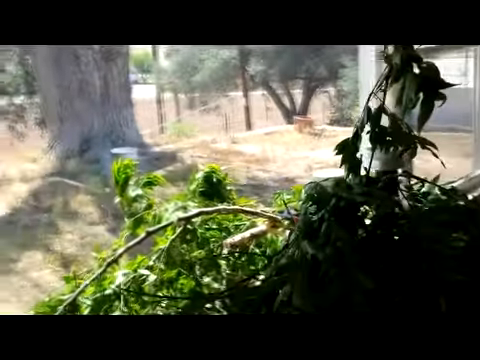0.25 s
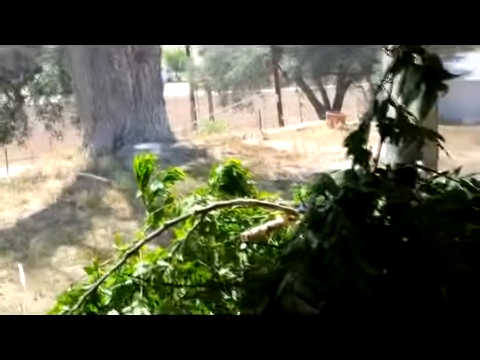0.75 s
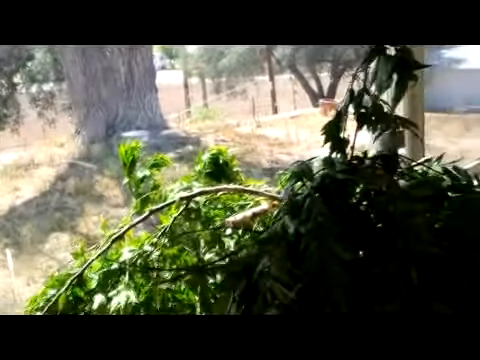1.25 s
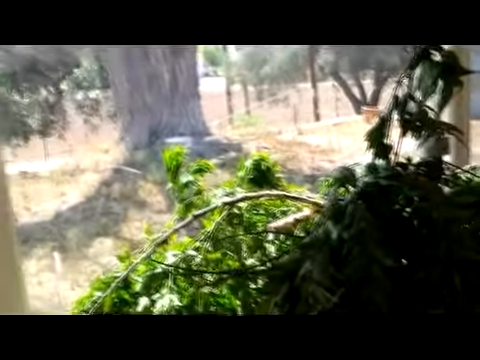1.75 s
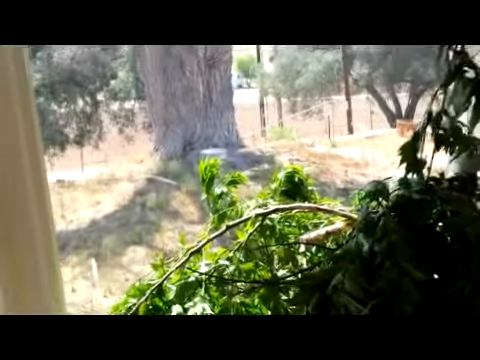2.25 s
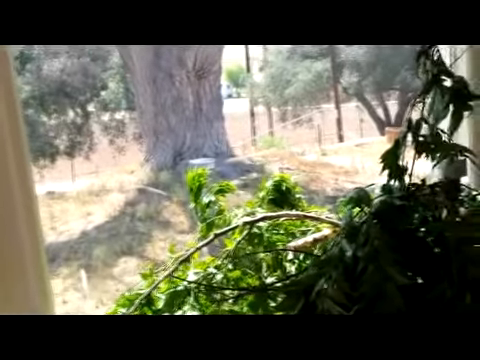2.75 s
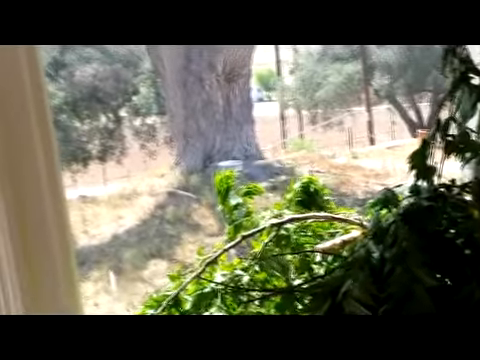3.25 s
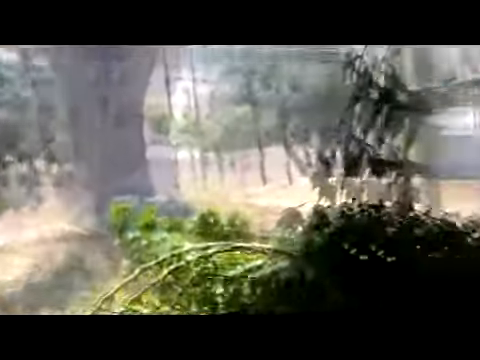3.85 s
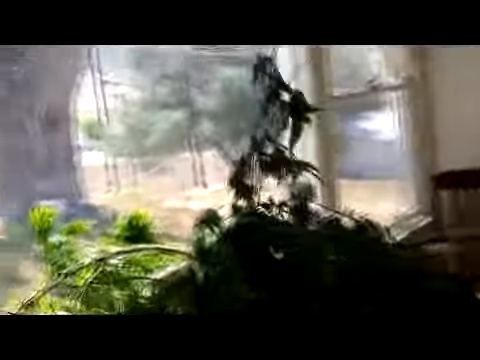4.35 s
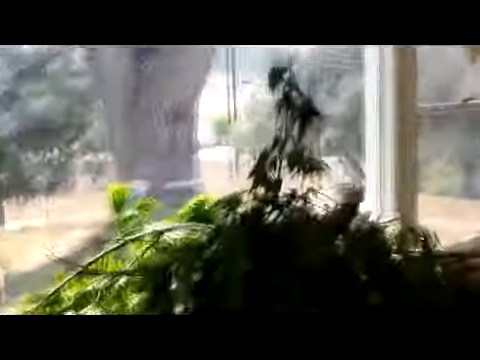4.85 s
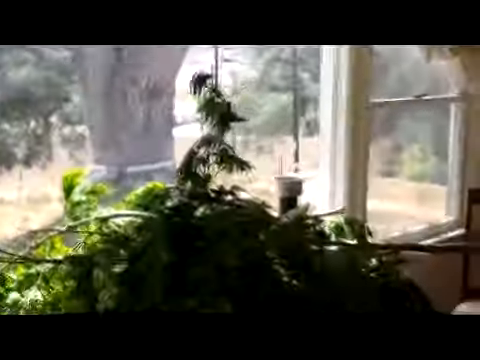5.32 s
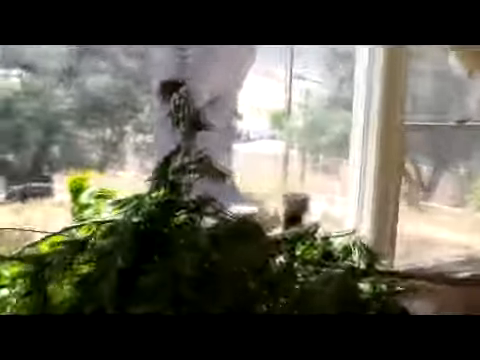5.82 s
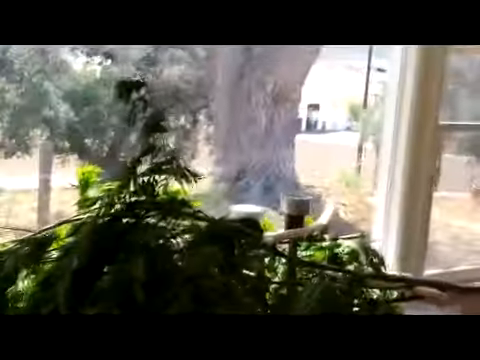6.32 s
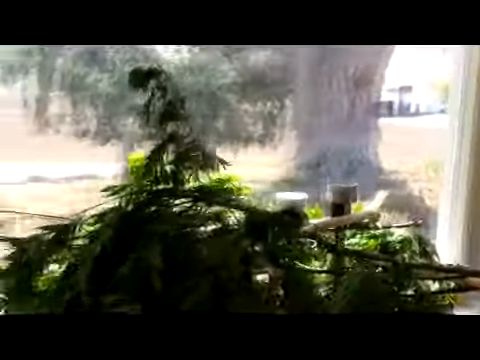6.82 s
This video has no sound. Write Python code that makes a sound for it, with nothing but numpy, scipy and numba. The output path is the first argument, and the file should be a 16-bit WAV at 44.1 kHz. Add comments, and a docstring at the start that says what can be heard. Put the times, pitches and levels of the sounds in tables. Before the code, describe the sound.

A bare wooden room with short, bright echoes, heard through a hissy handheld stereo microphone; low rumble swells and fades. A parrot bites twigs: crisp crackles at 0.2 and 0.34 s, soft thuds around 0.4-0.55, a camera tick close on the left at 0.55, then a dense splintering run at 0.64-0.69. A very faint thin whine lingers until 1.3. Light snaps at 1.7-1.9, a stronger cluster at 2.17-2.3, a sharp left-leaning pair at 3.15. Hard left camera ticks strike at 3.1 and 3.7, with a bright tick beside the latter. Another crunchy snap falls at 4.38. At 4.62-4.69 a quick sliding swish, deep thumps and a piercing tick; hiss and air sink for about a second, broken by a tick at 4.9. Background returns by 6; a patter of soft knocks at 6.26-6.32, a tiny board squeak at 6.38, the loudest snap at 6.5, and a last left tick at 6.86.

```python
"""From the start there is hiss, air and a low rumble that swells at times; they sink for about a second near 4.7 s.
From 0.2 s a parrot bites twigs in a bare wooden room: noisy runs of short crackles ring on between the walls.
A thin whine (a narrow band of noise) joins early, then bright damped ticks and soft thuds of decaying sine.
At 0.55 s the camera shell first ticks, close to the left microphone, as a handful of damped modes.
From about 1.2 s swishes of band noise pass by, a few sliding in pitch; late on, a sine squeaks like a board."""
import sys
import numpy as np
from scipy import signal
from scipy.fft import rfft, irfft
from scipy.io import wavfile
from scipy.ndimage import uniform_filter1d
from numba import njit

SR = 44100
rng = np.random.default_rng(int(sys.argv[2]) if len(sys.argv) > 2 else 0)


def store_pcm(level_fs):
    """Save levels as 16-bit WAV."""
    pcm = np.round(np.clip(level_fs, -1, 1) * 32767).astype(np.int16)
    wavfile.write(sys.argv[1], SR, np.atleast_2d(pcm).T)


N = 312228


def undb(db):
    """Turn decibels into a plain multiplier."""
    return 10 ** (np.asarray(db) / 20)


def unit(x):
    """Scale a sound to an average (RMS) strength of 1."""
    return x / np.sqrt(np.mean(x ** 2))


def lean(left_minus_right_db):
    """Multipliers for left and right that share a level difference equally."""
    return undb(np.array([[left_minus_right_db], [-left_minus_right_db]]) / 2)


def curve(table):
    """Columns of a (t/s, value, ..) table, joined by straight lines, one value a sample."""
    s, *columns = np.transpose(table)
    return [np.interp(np.arange(N) / SR, s, c) for c in columns]


def on_log(points, hz, column=1):
    """Read a table column at the given pitches, spacing pitch as the ear does."""
    points = np.array(points)
    return np.interp(np.log(hz), np.log(points[:, 0]), points[:, column])


@njit
def sliding_band(x, hz, width):
    """State-variable band-pass whose centre may move, gain 1 there."""
    y, band, low = np.empty(len(x)), 0., 0.
    for i in range(len(x)):
        g, k = np.tan(np.pi * hz[i] / SR), width[i] / hz[i]
        v = (band + g * (x[i] - low)) / (1 + g * (g + k))
        band, low, y[i] = 2 * v - band, low + 2 * g * v, k * v
    return y


def resonate(x, modes):
    """Sum of fixed resonances, alternate signs to keep the valleys between them filled."""
    total = 0
    for k, (hz, width, db) in enumerate(modes):
        ringing = signal.lfilter(*signal.iirpeak(hz, hz / width, fs=SR), x)
        total = total + (-1) ** k * undb(db) * ringing
    return total


def resonate_twice(x, modes):
    """Pass through the same resonances twice, for steeper sides."""
    return resonate(resonate(x, modes), modes)


def blip(hz, rise_ms):
    """A heavily damped mode: a sine that swells to its peak in rise_ms, then dies away."""
    t = np.arange(600) / SR
    u = t * 1000 / rise_ms
    return u * np.exp(1 - u) * np.sin(2 * np.pi * hz * t)


def add(out, sound, s):
    """Mix a sound in, starting at s seconds."""
    i = int(s * SR)
    out[:, i:i + sound.shape[1]] += sound[:, :N - i]


def swells(s, db, rise_s, fall_s):
    """Level in dB, one row a swell, one value a millisecond: straight up to the peak, straight down."""
    late = np.arange(0, N / SR, 1 / 1000) - s[:, None]
    tens_of_db = np.where(late < 0, -late / rise_s[:, None], late / fall_s[:, None])
    return db[:, None] - 10 * tens_of_db, late


def per_sample(x):
    """Stretch one value a millisecond to one value a sample."""
    return np.interp(np.arange(N) / SR * 1000, np.arange(len(x)), x)


WANDER_PER_S = 12  # new random levels a second


def wander():
    """Random levels held briefly and smoothed into slopes; spread near 1."""
    k = int(SR / WANDER_PER_S)
    steps = np.repeat(rng.standard_normal(N // k + 1), k)
    return 1.2 * uniform_filter1d(steps, k)[:N]


# balance of hiss and air between the ears: f/Hz, left minus right level/dB
NOISE_LEAN = [(500, 0.5), (4400, 3.2), (8000, -0.6), (15000, -7.5)]


def coloured(points, shared_below_hz):
    """Noise of a given spectrum, silent outside it; alike in both ears in the bass, unrelated higher up."""
    hz = np.maximum(np.fft.rfftfreq(N, 1 / SR), 1)
    half_lean = on_log(NOISE_LEAN, hz) / 2
    inside = (hz > points[0][0]) & (hz < points[-1][0])
    share = 1 / (1 + (hz / shared_below_hz) ** 2)
    shared = np.sqrt(share) * rfft(rng.standard_normal(N))
    own = np.sqrt(1 - share) * rfft(rng.standard_normal((2, N)))
    level_db = on_log(points, hz) + np.array([half_lean, -half_lean])
    return unit(irfft((shared + own) * inside * undb(level_db), N))


# colour of the microphones' hiss: f/Hz, relative level/dB per Hz
HISS_SPECTRUM = [(1470, -16), (2500, -13.5), (3190, -12), (4970, -5.5), (6500, -0.5), (7980, -1.5),
                 (9270, -6.5), (13500, -16), (14900, -33.5), (15200, -56), (16500, -70)]
# colour of the mid-range air: f/Hz, relative level/dB per Hz
AIR_SPECTRUM = [(210, -19), (350, 0.5), (404, -2), (640, -3.5), (962, -5), (1260, -7), (3500, -6),
                (4550, -25), (7700, -120)]
# resonances of the rumble, the first is the deep part: f/Hz, width/Hz (of one pass), level/dB
RUMBLE = [(70, 40, 0), (112, 52, 4.5), (295, 93.5, 1), (185, 50, -9)]
# steady levels over time: t/s, hiss level/dB, air level/dB, rumble level/dB
STEADY = [(0.0, -45.5, -55, -60), (0.32, -43.5, -59, -58), (0.45, -43.5, -51, -56), (0.75, -43, -54, -56),
          (1.3, -43, -55, -58), (1.9, -43.5, -60, -60), (2.3, -43, -59, -57), (2.5, -45.5, -59, -58),
          (3.05, -43, -58, -60), (3.43, -45, -55.5, -62), (3.7, -44, -55.5, -58), (4.5, -43.5, -56, -58),
          (4.67, -42.5, -47, -56), (4.75, -52.5, -61.5, -60), (4.86, -56, -72, -76),
          (5.09, -57.5, -73, -74), (5.26, -62.5, -72, -73), (5.5, -61, -70, -72), (5.71, -55, -72, -76),
          (5.77, -51, -59.5, -60), (6.0, -46, -58, -59), (6.45, -43.5, -55, -60), (7.08, -43.5, -57, -57)]
# swells of low rumble, many just after a loud snap or thump:
# t/s, peak level/dB, deep part relative level/dB, time to rise 10 dB/s, time to fall 10 dB/s
RUMBLE_SWELLS = [(0.0, -48, -12, .02, .04), (0.47, -43, -14, .04, .025), (0.57, -46, -6, .025, .04),
                 (0.695, -40, -18, .03, .08), (0.78, -51, 1, .05, .14), (1.05, -54, 3, .04, .04),
                 (1.3, -54, -5, .2, .08), (2.34, -42.5, -9, .15, .09), (3.42, -57, 0, .2, .06),
                 (3.54, -51.5, 0, .05, .2), (3.77, -49, -14, .08, .03), (3.84, -50, -8, .025, .025),
                 (4.12, -48, -25, .03, .025), (4.43, -43, -5, .045, .12), (4.658, -28, 5, .013, .055),
                 (4.81, -52, -3, .03, .04), (4.95, -76, 19, .1, .2), (5.75, -50, -10, .015, .06),
                 (5.86, -53, -5, .05, .3), (6.31, -48, -8, .07, .1), (6.58, -45, 3, .055, .15),
                 (6.9, -49, 3, .05, .09), (7.07, -56, 8, .06, .08)]
DEEP_DB, WANDER_DB = -4, 2  # deep part of the steady rumble; how far both parts wander, each on its own


def background():
    """Hiss and air are coloured noise; rumble is noise in low resonances, nearly the same left and right."""
    hiss_db, air_db, low_db = curve(STEADY)
    s, db, deep_db, rise_s, fall_s = np.transpose(RUMBLE_SWELLS)
    swell_power = undb(2 * swells(s, db, rise_s, fall_s)[0])
    shared, own = rng.standard_normal(N), rng.standard_normal((2, N))
    upper = unit(resonate(resonate(shared + .3 * own, RUMBLE[1:]), [(182, 800, 0)]))
    deep = unit(resonate_twice(shared + .23 * own, RUMBLE[:1]))
    # steady rumble and swells add as powers
    upper_power = undb(2 * (low_db + WANDER_DB * wander())) + per_sample(swell_power.sum(axis=0))
    deep_power = undb(2 * (low_db + DEEP_DB + WANDER_DB * wander()))
    deep_power = deep_power + per_sample(undb(2 * deep_db) @ swell_power)
    rumble = np.sqrt(upper_power) * upper + np.sqrt(deep_power) * deep
    hiss = undb(hiss_db + .6 * wander()) * coloured(HISS_SPECTRUM, 300)
    air = undb(air_db) * coloured(AIR_SPECTRUM, 600)
    return hiss + air + rumble


# how the room fades: f/Hz, time to fall 60 dB/s, relative level/dB
ROOM_FADE = [(300, 1, 0.5), (686, 0.67, 3), (1580, .4, 5), (3720, 0.48, 1.5), (8300, 0.32, 7),
             (14500, 0.24, -2.5)]


def room():
    """Diffuse echo: noise in bands, each fading at its own rate, grainy while the echoes are still few."""
    t = np.arange(SR // 2) / SR
    grain_db = np.repeat(rng.standard_normal((2, 1000)), 24, axis=1)[:, :len(t)]
    grain = undb(4 * np.clip(t / .008, 0, 1) * np.exp(-t / .09) * grain_db)
    out = 0
    for hz in 200 * 2. ** np.arange(0, 6.4, .5):
        noise = rng.standard_normal((2, len(t)))
        band = resonate(noise, [(hz, hz / 3, on_log(ROOM_FADE, hz, column=2))])
        out = out + band * lean(1.2) * undb(-60 * t / on_log(ROOM_FADE, hz))
    near = 1 + .4 * np.exp(-t / .01)  # leaves, perch and window throw the first echoes back strongest
    return out * grain * near * np.clip(t / .0015, 0, 1) * .045


# tearing fibres, the last is the upper one: multiple of fibre f, width/Hz, level/dB
FIBRES = [(.76, 1100, -5.5), (1.0, 1000, 0), (1.35, 1400, 0)]
# thicker wood the twigs grow from: f/Hz, width/Hz (of one pass), level/dB
THICK_WOOD = [(760, 1430, 0)]
# finest splinters: f/Hz, width/Hz, level/dB
FINE_SPLINTERS = [(10400, 1700, 0.5), (13000, 2600, -7.5)]
# twig snaps: t/s, nominal level/dB, fibre f/Hz, upper fibre extra level/dB, twig f/Hz,
# twig width/Hz (of one pass), then relative level/dB of twig, bough and splinters,
# left minus right level/dB (direct sound), splintering time/ms, level sent to the room/dB
TWIG_SNAPS = [(0.1954, -25, 6300, 4, 2300, 1900, 2, -16, 1, -5, 1.8, -10.5),
              (0.3393, -30, 6300, 0.1, 2800, 1900, -12, -20, -3.5, -9, 1.2, -14),
              (0.6366, -22, 6400, -3, 2300, 2200, -7, -11, -4, -5, 1.8, -2.5),
              (0.6395, -22, 6400, -1.5, 4100, 1800, -4, -20, -3, -5, 1.8, -7),
              (0.649, -25, 6600, -3, 2600, 1800, -9, -20, -10, -3, 2.2, -12),
              (0.668, -27, 5900, -4, 2600, 1800, -9, -20, -10, -3, 3, -12),
              (0.686, -33, 6500, -3, 2200, 1500, -14, -20, -10, -3, 3, -12),
              (1.7212, -31, 6800, -5, 3000, 1900, -16, -30, -13, -3, 1.2, -6.5),
              (1.7955, -30.5, 7800, -5, 2900, 1900, -18, -23, -1.5, -8, 1.8, -7),
              (1.9215, -36, 7000, 0.1, 3000, 1900, -16, -20.5, 1.5, -2, 1.2, -12),
              (2.169, -22, 5900, -5, 2000, 1800, -8, -12, -5, 2.5, 1.6, -5),
              (2.247, -20, 6200, -2.5, 2300, 2000, -7, -14, -9, 0.1, 2.2, -6),
              (2.2585, -24, 6400, -6, 1900, 1700, -8, -16, -10, -2, 2.5, -9),
              (2.272, -26, 6300, -5, 3900, 1500, -7, -20, -8, -2, 5, -10),
              (2.304, -33, 6400, -7, 2300, 1500, -12, -20, -10, -2, 4, -10),
              (2.5835, -41, 5750, 0.1, 3300, 1900, -16, -13, -2, 1.5, 2.2, -9),
              (3.145, -23.5, 7100, -8, 3000, 2300, -1.5, -22, -12, 6, 1.8, -8),
              (3.1505, -29, 6800, -4, 3300, 2000, -3, -22, -12, 4, 1.8, -10),
              (3.752, -36, 5750, 0.1, 2300, 1900, -17, -23, -3, 0.1, 3, -10),
              (4.2775, -39, 6000, -3, 2500, 1900, -15, -25, -6, 0.1, .8, -14),
              (4.381, -19, 5300, -1.5, 2700, 2200, -16, -14, -5, 0.1, 3, -4.5),
              (4.3935, -24, 5600, 0.1, 2500, 1900, -15, -16, -3, 0.1, 1.5, -8),
              (4.405, -28, 6000, 0.1, 2500, 1900, -15, -22, -6, 0.1, 2.2, -10),
              (4.6896, -36, 5750, 0.1, 2200, 1900, -2.5, -15, -8, 3, 8, -7),
              (5.0735, -54, 5750, 0.1, 3500, 1900, -5, -21, -4, -1.5, 9, -4),
              (5.5108, -41, 5750, 0.1, 2900, 1900, -13, -28, -11, -3, 2.2, -5),
              (5.7407, -52, 5750, 0.1, 3400, 1900, -8, -14, -13, 0.6, 12, 0.1),
              (5.843, -52, 5750, 0.1, 3600, 1900, -4, -11, -13, 1.5, 9, 0.1),
              (6.45, -48, 5750, 0.1, 1690, 1900, 9.5, 0.1, -6, -1.5, 5, -8.5),
              (6.5, -25, 6200, 2.5, 3600, 1900, -17, -30, 1.5, -2.5, 1.2, -9),
              (6.5048, -12, 5700, -1.5, 3000, 2200, -18, -19, -6, 0.1, 1.5, -4.5),
              (6.5155, -20, 6200, 0.1, 2600, 1900, -18, -25, -9, 0.1, 2.2, -12),
              (6.5225, -21, 6000, 0.1, 2600, 1900, -18, -25, -9, 0.1, 2.2, -12)]


def snaps():
    """Each bite is a quick run of splintering fibres that rings the wood, then the room."""
    dry, wet, t = np.zeros((2, N)), np.zeros((1, N)), np.arange(2048) / SR
    pulse = signal.unit_impulse(len(t))
    thin = -signal.lfilter(*signal.butter(3, 3600, "high", fs=SR), pulse)  # fibres lack the low end
    bough, splinter = -resonate_twice(pulse, THICK_WOOD), resonate(pulse, FINE_SPLINTERS)
    for (s, db, fibre_hz, upper_db, twig_hz, twig_width_hz, twig_db, bough_db, splinter_db,
         pan_db, splintering_ms, room_db) in TWIG_SNAPS:
        fibres = [(fibre_hz * k, width, level + upper_db * (k > 1.1)) for k, width, level in FIBRES]
        twig = resonate_twice(pulse, [(twig_hz, twig_width_hz, 0)])
        parts = np.array([resonate(thin, fibres), twig, splinter, bough])
        energy = np.sum(parts ** 2, axis=1)[:, None]
        parts *= 6 * undb(db + np.array([[0], [twig_db], [splinter_db], [bough_db]])) / np.sqrt(energy)
        # about three samples in ten carry a small crackle; the first sample gets an extra push
        crackles = rng.standard_normal((2, len(t))) * (rng.random(len(t)) < .3)
        run = crackles * np.exp(-t * 1000 / splintering_ms)
        run[:, 0] += 1.2
        run = run / np.sqrt(np.mean(run ** 2) * len(t))
        near = parts[:3].sum(axis=0) + .4 * parts[3]  # the thick wood answers mostly through the room
        bite = signal.fftconvolve(run, near[None], axes=1)
        add(dry, bite * lean(pan_db), s)
        add(wet, undb(room_db) * parts.sum(axis=0)[None], s)
    return dry + signal.fftconvolve(wet, room(), axes=1)[:, :N]


# a faint thin whine early on: t/s, f/Hz, level/dB
THIN_WHINE = [(0.3, 2050, -75), (0.44, 2080, -60.5), (0.8, 2080, -62.5), (1.22, 2030, -67),
              (1.35, 2030, -80)]


def whine():
    """A very narrow band of noise makes a wavering tone, silent outside its table."""
    hz, db = curve(THIN_WHINE)
    t = np.arange(N) / SR
    on = np.clip(np.minimum(t - THIN_WHINE[0][0], THIN_WHINE[-1][0] - t) * 10, 0, 1)
    return on * undb(db) * unit(sliding_band(rng.standard_normal(N), hz, hz / 50))


# bright ticks: t/s, tone level/dB, left f/Hz, right f/Hz, left minus right level/dB,
# left delay/ms, tone rise/ms, broad click relative level/dB (halved in the left)
BRIGHT_TICKS = [(0.3189, -32.5, 4200, 4200, -16, 0, 0.17, -25),
                (3.7343, -9.5, 7200, 8650, 3, .1, 0.13, -23),
                (4.669, -4, 7270, 7850, -5.5, .4, 0.22, -11.5),
                (4.9121, -18, 6900, 8000, -3, .5, 0.18, -12)]


def bright_ticks():
    """A damped tone, pitched for each side, with a broad click made of five short modes."""
    out = np.zeros((2, N))
    click = blip(12300., .24) + blip(2300., .12) + .6 * blip(3400., .3)
    click = click + .4 * blip(900., .3) + .5 * blip(5830., .33)
    for s, db, left_hz, right_hz, pan_db, late_ms, rise_ms, click_db in BRIGHT_TICKS:
        left = blip(left_hz, rise_ms) + .5 * undb(click_db) * click
        right = blip(right_hz, rise_ms) + undb(click_db) * click
        add(out[:1], undb(db + pan_db / 2) * left[None], s + late_ms / 1000)
        add(out[1:], undb(db - pan_db / 2) * right[None], s)
    return out


# dull thuds: t/s, level/dB of the low mode, f/Hz, time to fall 60 dB/s,
# edge drive relative level/dB, edge f/Hz
DULL_THUDS = [(0.401, -44, 400, 0.027, 8, 950), (0.4542, -24.5, 235, 0.04, -3, 850),
              (0.5548, -29, 292, 0.027, -9, 900), (3.568, -48, 297, 0.055, 12.5, 900),
              (4.1208, -37.5, 440, 0.028, 6.5, 900), (5.991, -42.5, 356, 0.078, -22, 900),
              (4.6405, -19, 140, 0.062, -20, 500), (4.656, -21, 105, .06, -20, 500),
              (4.689, -23.5, 125, 0.095, -14, 500), (6.257, -45, 400, .04, 5, 750),
              (6.2635, -41, 380, .04, 1.5, 800), (6.278, -43, 300, .04, -4, 650),
              (6.285, -43, 330, .05, -3, 700), (6.301, -43, 332, 0.05, -4, 650),
              (6.322, -42, 300, .06, -9, 600)]


def thuds():
    """Soft blows: one low decaying sine and a brief sharper edge of filtered noise."""
    out, t = np.zeros((2, N)), np.arange(8000) / SR
    for s, db, hz, t60, edge_db, edge_hz in DULL_THUDS:
        noise = rng.standard_normal(len(t)) + .27 * rng.standard_normal((2, len(t)))
        noise[:, :6] += 3  # the first contact
        edge = resonate(noise * undb(-60 * t / .043), [(edge_hz, 1.4 * edge_hz, edge_db)])
        edge = resonate(edge, [(1.1 * edge_hz, 1.9 * edge_hz, 0)])
        body = np.sin(2 * np.pi * hz * t) * undb(-60 * t / t60)
        add(out, undb(db) * (body + edge) * lean(1.2), s)
    return out


# short modes of the camera shell: f/Hz, level/dB before the tilt, rise/ms
SHELL_MODES = [(1030, -19, .9), (2725, 2, 0.27), (5120, 2, 0.36), (6850, 1, 0.3), (8900, -9, 0.3),
               (12200, -9, 0.21), (13700, -16, 0.3)]
# camera ticks by the left microphone: t/s, left peak level/dB,
# left minus right level/dB at 2800 Hz, tilt/dB per octave
SHELL_TICKS = [(0.554, -16, 25, -9), (3.1092, -1, 28, -1), (3.4399, -25.5, 23, -5), (3.568, -32, 15, -7),
               (3.72, -3.5, 26, -4), (6.862, -1, 28, -1.5)]


def shell_ticks():
    """Slips in the camera shell ring its short modes; the far microphone gets them late and thin."""
    out = np.zeros((2, N))
    hz, mode_db, rise_ms = np.transpose(SHELL_MODES)[:, :, None]
    octaves = np.log2(hz / 2800)
    for s, db, pan_db, tilt_db in SHELL_TICKS:
        detuned_hz = hz * (1 + .015 * rng.standard_normal(hz.shape))
        modes = undb(mode_db + tilt_db * octaves) * blip(detuned_hz, rise_ms)
        near = modes.sum(axis=0)
        far = np.sum(modes * undb(-pan_db + 11.6 * octaves), axis=0)
        size = undb(db) / np.max(np.abs(near))
        add(out[:1], size * near[None], s)
        add(out[1:], size * far[None], s + .00021)
    return out


# swishes of air and faint rustles: t/s, peak level/dB, centre f/Hz at the peak, width as a share
# of the centre (of one pass), time to rise 10 dB/s, time to fall 10 dB/s,
# slide/octaves per s (0 stays put)
SWISHES = [(1.22, -50, 950, 2.2, .06, .05, 0), (3.59, -51, 700, 2.2, .016, .09, 0),
           (4.617, -35, 880, .7, .028, .012, 3), (4.634, -30, 650, .8, .012, .028, -12),
           (5.39, -60, 700, 2.2, .026, .026, 0), (6.13, -54, 890, 2.2, .024, .08, -2),
           (6.29, -46, 580, 1.2, .025, .065, 0)]


def swish():
    """Swishes of band noise, a few of them sliding in pitch; the loudest of the moment sets the band."""
    s, db, hz, share, rise_s, fall_s, slide = np.transpose(SWISHES)
    level_db, late = swells(s, db, rise_s, fall_s)
    loudest = level_db.argmax(axis=0)
    centre = np.clip(hz[:, None] * 2 ** (slide[:, None] * np.clip(late, -.15, .15)), 350, 950)
    hz = per_sample(np.take_along_axis(centre, loudest[None], axis=0)[0])
    width = per_sample(share[loudest]) * hz
    shared = rng.standard_normal(N)
    sides = []
    for _ in range(2):
        noise = shared + .35 * rng.standard_normal(N)
        sides.append(unit(sliding_band(sliding_band(noise, hz, width), hz, width)))
    return undb(per_sample(level_db.max(axis=0))) * np.array(sides)


# one short wooden squeak: t/s of its middle, length/s, f/Hz, level/dB
BOARD_SQUEAK = (6.376, .04, 760, -48.5)


def squeak():
    """A board squeaks once: a steady sine under a rounded swell, equal on both sides."""
    out = np.zeros((2, N))
    s, length, hz, db = BOARD_SQUEAK
    t = np.arange(int(length * SR)) / SR
    tone = np.sin(np.pi * t / length) ** .5 * np.sin(2 * np.pi * hz * t)
    add(out, np.ones((2, 1)) * undb(db) * tone, s - length / 2)
    return out


def scene():
    """All the sounds together."""
    return background() + snaps() + whine() + bright_ticks() + thuds() + shell_ticks() + swish() + squeak()


def record(dry):
    """Microphones miss the deepest bass; a limiter ducks some 30 ms just after sharp peaks; the top is cut."""
    dry = signal.sosfilt(signal.butter(2, 38, "high", fs=SR, output="sos"), dry)
    over = np.maximum(np.max(np.abs(dry), axis=0) - .65, 0)
    hold = np.concatenate([np.zeros(90), np.hanning(3000)[1500:]])  # waits 2 ms, then lets go smoothly
    duck_db = np.clip(-10.5 * signal.fftconvolve(over, hold)[:N], -6.5, 0)
    top_cut = signal.ellip(10, .2, 90, 16700, fs=SR, output="sos")
    return signal.sosfilt(top_cut, dry * undb(duck_db))


dry = scene()
out = record(dry)
store_pcm(out)
```